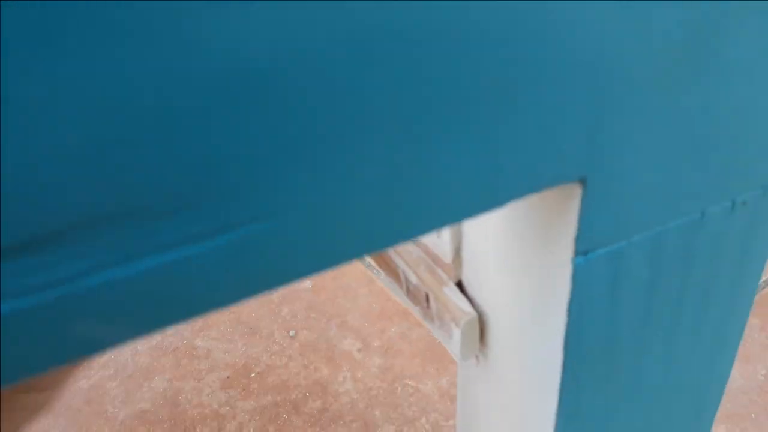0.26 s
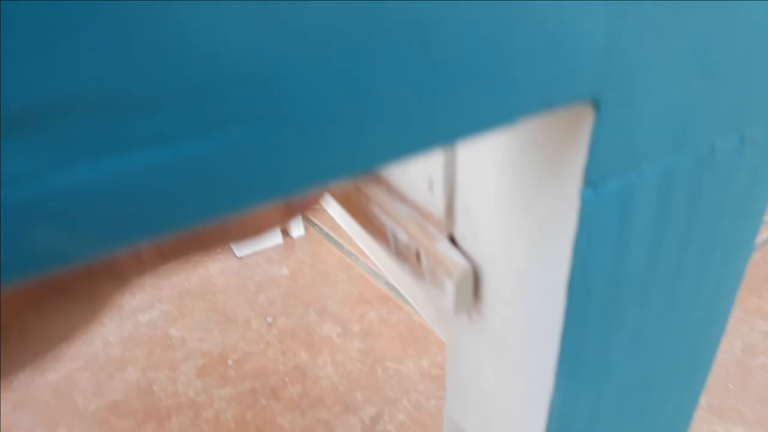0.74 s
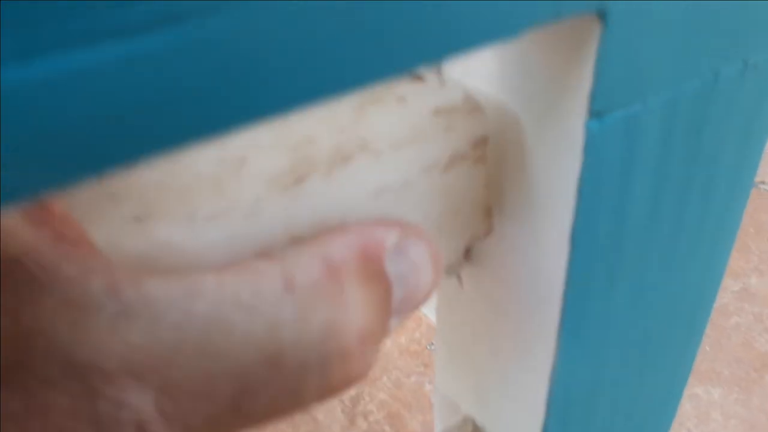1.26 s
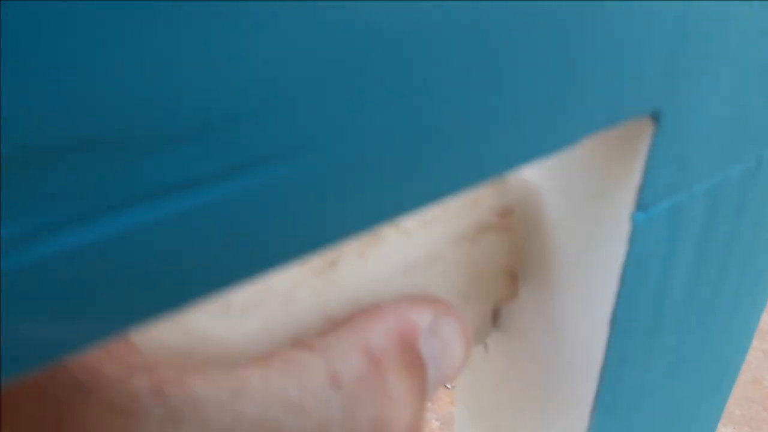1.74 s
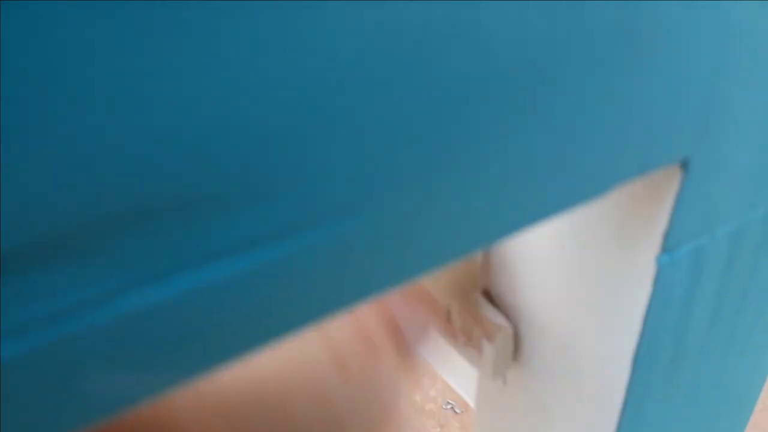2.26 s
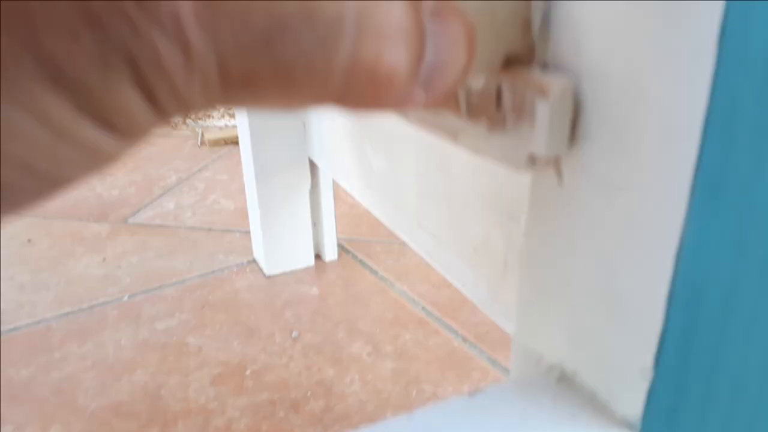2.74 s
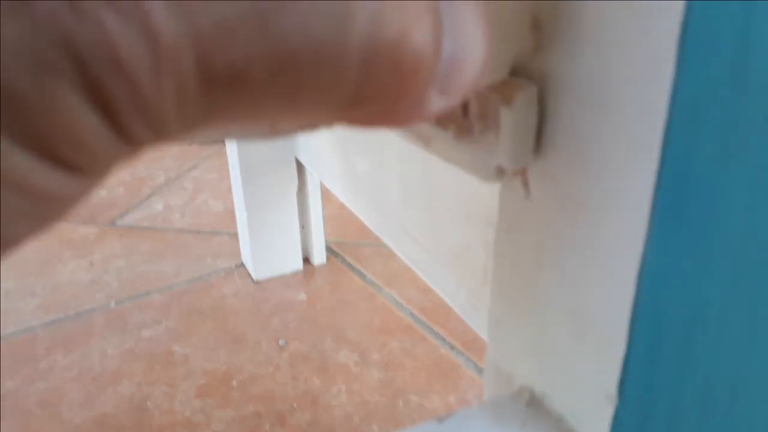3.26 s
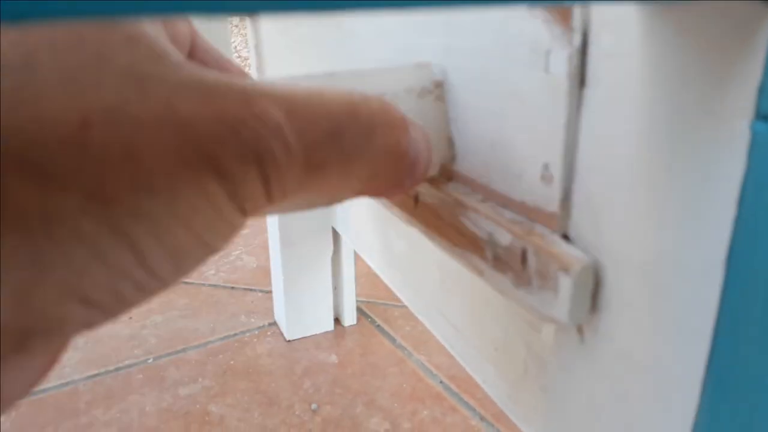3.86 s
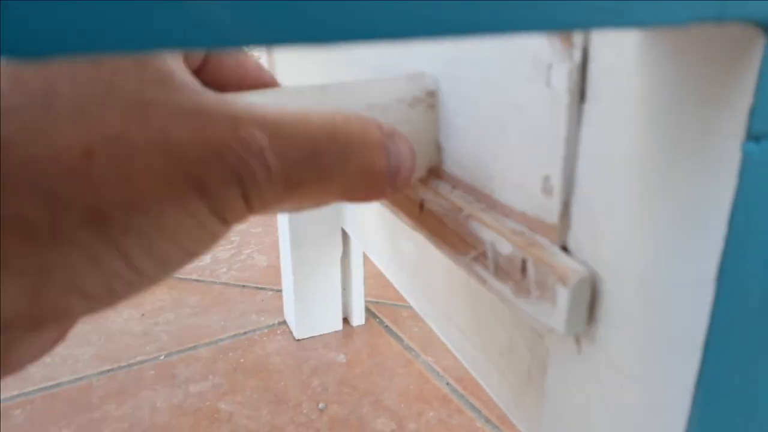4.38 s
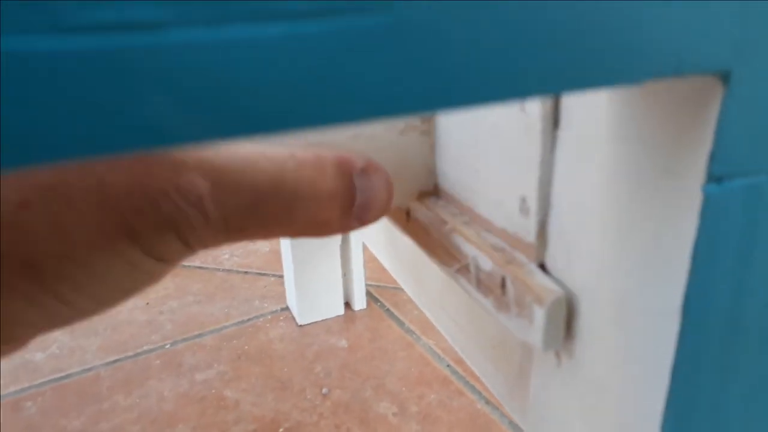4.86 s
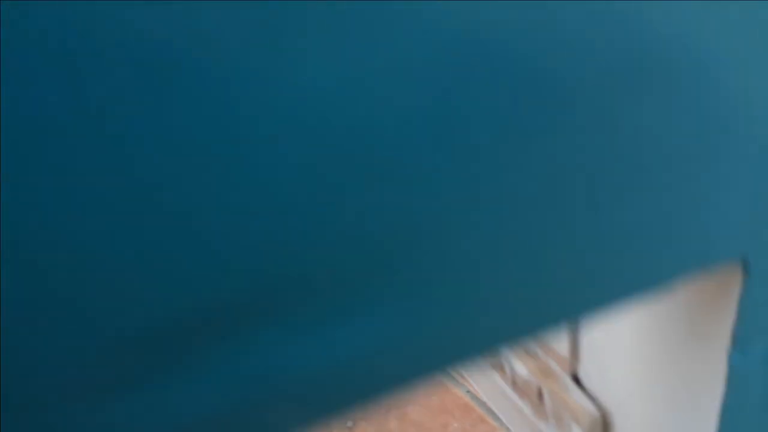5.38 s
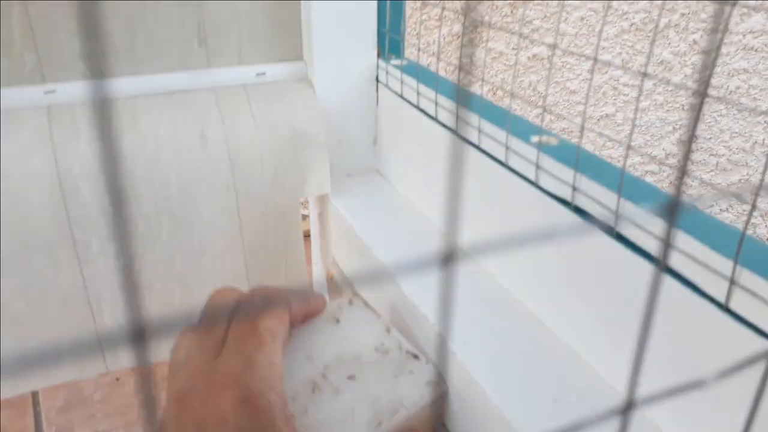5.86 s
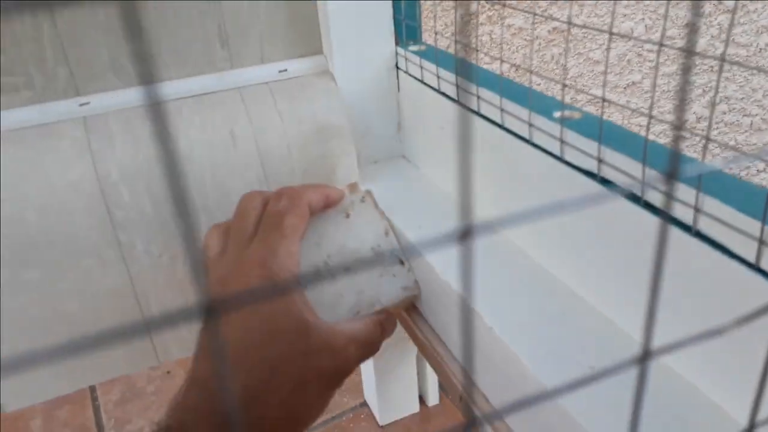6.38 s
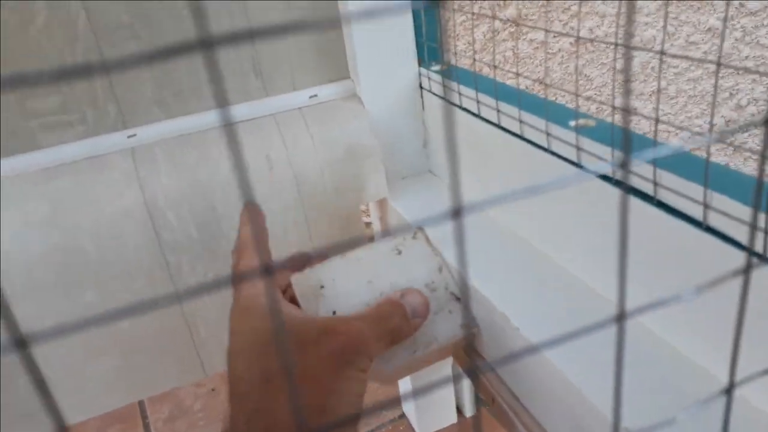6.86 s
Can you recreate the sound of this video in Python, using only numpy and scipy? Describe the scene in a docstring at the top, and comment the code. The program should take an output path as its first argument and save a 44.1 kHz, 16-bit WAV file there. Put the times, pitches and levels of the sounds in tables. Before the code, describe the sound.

Close up in a small room, wax scrapes and hisses along wood in uneven strokes, with light knocks and dry ticks near the end.

```python
"""A brief scrape and a sharp wooden knock open the scene: a block of wax strikes a drawer runner in a cabinet.
Impact excites the damped modes of frame and panel; rubbed back and forth, the wax hisses by sliding friction.
At each turn stick-slip gives a scrape that falls in pitch, and the side panel shudders.
Soft hisses are noise in drifting resonances; squeaks, ticks and whistles are resonances, bursts and tones.
A hand-held camera is close by in a small room: handling thumps, an echo, a short tail and quiet air."""
import sys
import numpy as np
from scipy import signal
from scipy.fft import rfft, irfft, next_fast_len
from scipy.io import wavfile

SR = 44100
rng = np.random.default_rng(int(sys.argv[2]) if len(sys.argv) > 2 else 0)


def to_wav(sig):
    """Store sig (one row per channel, or 1-D mono) as 16-bit WAV at the path in sys.argv[1].

    Samples outside -1..1 are clipped; the rate is SR.
    """
    pcm = np.clip(np.atleast_2d(sig), -1, 1) * 32767
    pcm = np.round(pcm).astype(np.int16)
    wavfile.write(sys.argv[1], SR, pcm.T)  # frames by channels


N = 314080  # length [samples]

# Impacts of block on wood: (time [s], blow level before the low cut [dB], centre of favoured modes [Hz],
# their spread [octaves], crack [dB], panel boom [dB], first touch relative to blow [dB], its scratch [dB])
KNOCKS = [(.0612, -12.5, 480, .58, -15.5, -29, -50, -70), (.0725, -20.5, 540, .35, -46, -40, -30, -60),
          (.3692, -25, 380, .45, -47, -44, -11, -40), (.6884, -19.5, 700, .8, -47, -46, -15, -39),
          (2.052, -42, 560, .9, -56, -52, -14, -62), (3.0885, -32.5, 620, .7, -58, -48, -15, -56),
          (3.115, -42, 520, .6, -66, -56, -20, -70), (3.351, -36, 580, .7, -62, -51, -14, -60),
          (3.746, -40, 560, .85, -60, -50, -12, -62), (3.843, -42, 520, .8, -62, -50, -14, -66),
          (4.401, -46, 500, .7, -64, -56, -12, -66), (4.718, -30.5, 560, .65, -62, -54, -12, -62),
          (4.8505, -20.5, 590, .9, -48, -42, -4, -44), (5.188, -38, 560, .7, -66, -54, -14, -70),
          (5.689, -39, 620, .7, -66, -56, -14, -70), (5.854, -33, 540, .65, -66, -50, -14, -70)]
# Spectral shape of a brittle crack: (frequency [Hz], gain [dB])
CRACK_SPECTRUM = [(300, -24), (1000, 13), (1800, 0.5), (2900, -0.5), (3300, 3.5), (4400, -9.5), (5900, 2.5),
                  (7400, -3.5), (8600, -27), (12000, -12.5), (15800, -59.5)]


def brittle_burst(top_hz, t60):
    """Band-limited impact: decaying noise whose treble is limited by the contact time."""
    t = np.arange(SR // 8) / SR
    burst = coloured(noise_pair(len(t)),
                     lambda f: read(CRACK_SPECTRUM, f) - 10 * np.log10(1 + (f / top_hz) ** 4))
    return burst * amp(-60 * t / t60)


def knocks(wood, panel, thud_db=0.5, thud_t60=0.09, push_db=-6.5, push_cycles=1.7, crack_t60=0.019,
           touch_s=0.0037, touch_t60=0.048, crack_top_hz=9000, dulling=0.068, contact_s=0.00029):
    """Impact excitation: a corner touches first, then a blow sets off push, thud, modes, crack and boom."""
    out, t = np.zeros((2, N)), np.arange(wood.shape[1]) / SR
    boom = coloured(panel, lambda f: hump(f, 160, 0.61)) * (1 - np.exp(-t / 0.029))
    for s, db, centre_hz, spread, crack_db, panel_db, touch_db, scratch_db in KNOCKS:
        push = np.sin(2 * np.pi * centre_hz * t) * np.exp(-centre_hz * t / push_cycles)
        thud = noise_pair(len(t)) * amp(-60 * t / thud_t60)
        frame = held(wood, shift=.012, spot_db=1.5, damping_db_per_s=0)
        thud = coloured(thud, lambda f: 1.76 * hump(f, centre_hz, spread))
        modes = coloured(frame, lambda f: 1.76 * hump(f, centre_hz, spread))
        # the wax gives a little, so the blow starts softly
        contact = 1 - np.exp(-(t / contact_s) ** 2)
        body = levelled(push, push_db, .02) + levelled(thud, thud_db, .02) + levelled(modes, 0, .02)
        body = levelled(body * contact, db, .02)
        # the narrow frame radiates little bass
        body = signal.sosfilt(signal.butter(2, 170, "high", fs=SR, output="sos"), body)
        # a softer blow stays longer in contact and sounds duller; dulling is in octaves per dB
        top_hz = crack_top_hz * 2 ** (dulling * (crack_db + 25.5))
        crack = brittle_burst(top_hz, crack_t60)
        scratch = brittle_burst(top_hz, touch_t60)
        add(out, s, body + levelled(boom, panel_db, .06))
        add(out, s, levelled(crack, crack_db, .006))
        add(out, s - touch_s, amp(touch_db) * body * amp(-60 * t / 0.065))
        add(out, s - touch_s, levelled(scratch, scratch_db, .006))
    return out


# Lightly damped runner modes after the first knock: (frequency [Hz], level [dB], decay t60 [s])
FREE_MODES = [(537, -34, 1), (500, -42.5, .6), (431, -41, .5), (716, -46.5, .6)]
RING_END_S = 0.33  # from the first knock to the end of the free ring


def free_ring(damping_s=0.063):
    """Free vibration: lightly damped modes sound on after the first knock, then are faded to silence."""
    out, t = np.zeros((2, N)), np.arange(SR // 2) / SR
    fade = np.clip((RING_END_S - t) / damping_s, 0, 1)
    add(out, KNOCKS[0][0], ring(FREE_MODES, lag=.00005) * fade)
    return out


# Strokes that grip and then slide: (time [s], length [s], scrape level [dB], scrape pitch [Hz],
# panel shudder [dB], hiss before the overall hiss gain [dB])
STROKES = [(0.0, 0.061, -36.5, 540, -47, -42), (0.9, 0.12, -47.5, 656, -47, -52.5),
           (1.205, 0.091, -43, 436, -48, -54), (1.322, 0.14, -49, 627, -50, -58),
           (1.492, 0.07, -47, 570, -51.5, -56.5), (1.6, 0.12, -51.5, 600, -51, -61.5),
           (1.752, 0.079, -46.5, 537, -43, -56.5), (1.855, 0.15, -49, 620, -50, -60),
           (2.037, 0.1, -54.5, 600, -45.5, -61), (2.148, 0.12, -54, 660, -56.5, -62),
           (2.287, 0.13, -55, 546, -48.5, -59.5), (2.407, 0.16, -73, 750, -71, -61),
           (3.195, 0.1, -51.5, 587, -46, -62.5), (3.492, 0.06, -39, 560, -48.5, -62),
           (3.59, 0.083, -44, 680, -51, -65.5), (3.728, 0.087, -42, 560, -44.5, -59.5),
           (3.826, 0.095, -45.5, 513, -45, -58), (3.942, 0.12, -40.5, 684, -42, -75),
           (4.094, 0.11, -50.5, 580, -52, -65), (4.224, 0.076, -44, 600, -48, -69),
           (4.384, 0.094, -51.5, 580, -57, -60), (4.661, 0.13, -56, 537, -51, -61),
           (4.76, 0.16, -53, 590, -47.5, -58), (4.972, 0.11, -36.5, 570, -48.5, -58),
           (5.143, 0.13, -43, 540, -44, -61.5), (5.302, 0.15, -44.5, 690, -45, -63.5),
           (5.495, 0.089, -39.5, 477, -41, -64), (5.666, 0.1, -45.5, 580, -49, -58.5),
           (5.82, 0.1, -40.5, 520, -40.5, -64.5), (5.963, 0.17, -43, 540, -45, -66),
           (6.162, 0.12, -42, 393, -48.5, -60.5), (6.325, 0.14, -53.5, 714, -51, -63.5),
           (6.658, 0.12, -46.5, 318, -48, -58), (6.754, 0.061, -53, 430, -66, -66)]
# Rasp on top of each scrape: (time [s], level relative to the scrape [dB])
RASP = [(0, -28), (1.3, -20), (1.8, -18), (2.4, -10.5), (3.5, -19), (4.0, -17), (5.35, -18.5), (5.5, -23),
        (6.7, -39)]
GRIP_SHARE, BUILD_SHARE = 0.64, 0.27  # gripping part of a stroke; part of the grip that builds pressure
LEAD_S = .03  # the wax starts to catch this long before the grip
SHOVE_DELAY_S = 0.0077  # from the start of the grip to the shove on the panel
FALL_OCTAVES = .12  # fall of the scrape's pitch during the grip


def scrapes(wood, panel, width_hz=560, rasp_hz=1480, dead_db=-1.0, scrape_db=0.0, shudder_db=0.0,
            shove_db=-4.0, shove_share=0.37, swell_share=0.15):
    """Stick-slip friction: slips swell through a falling resonance, and the grip shoves the panel."""
    out, t = np.zeros((2, N)), np.arange(wood.shape[1]) / SR
    for s, length, db, hz, panel_db, _ in STROKES:
        frame = held(wood, shift=.06, spot_db=3, damping_db_per_s=130)
        board = held(panel, shift=.04, spot_db=4, damping_db_per_s=30)
        grip = GRIP_SHARE * length
        heard_s = LEAD_S + grip
        u = (t - LEAD_S) / grip  # progress through the grip
        release = np.exp(-.5 * np.maximum(u - BUILD_SHARE, 0) - np.maximum(u - .85, 0) / 0.15)
        press = release / (1 + np.exp((BUILD_SHARE / 2 - u) / swell_share))
        slips = stick_slip(len(t)) * press
        pitch = hz * 2 ** (FALL_OCTAVES * (.55 - np.clip(u, 0, 1.3)))
        drive = coloured(resonate(slips, pitch, width_hz), lambda f: 2.5 * hump(f, hz, 1.1))
        rasp = coloured(slips, lambda f: 2.5 * hump(f, rasp_hz, 0.52))
        # the frame's modes answer, over the direct sound of the slips
        scrape = levelled(through(drive[0], frame)[:, :len(t)], 0, heard_s)
        scrape = scrape + levelled(drive, dead_db, heard_s)
        rasp_db = np.interp(s, *np.transpose(RASP))
        scrape = levelled(scrape, 0, heard_s) + levelled(rasp, rasp_db, heard_s)
        add(out, s - LEAD_S, scrape * amp(db + scrape_db) * np.sqrt(grip / heard_s))
        # the shove is a dull push, longer in a slow stroke, and it leaves the panel ringing
        shove = coloured(noise_pair(len(t)), lambda f: 1.3 * hump(f, 140.0, 0.66))
        shove = shove * t * np.exp(-t / grip / shove_share)
        ringing = levelled(through(shove[0], board)[:, :len(t)], -2.4, 0.11)
        ringing = ringing + levelled(board * (1 - np.exp(-t / 0.018)), 0, 0.033)
        shudder = ringing + levelled(shove, shove_db, 0.22)
        add(out, s + SHOVE_DELAY_S, levelled(shudder, panel_db + shudder_db, 0.13))
    return out


def stick_slip(size, per_s=125, uneven_octaves=.6, uneven_db=3.5, slip_s=0.0032, creep_db=-10):
    """Relaxation oscillation: an uneven train of decaying noise bursts, one a slip, over a steady creep."""
    turns = np.cumsum(per_s * 2 ** (uneven_octaves * wander(size, per_s))) / SR
    strength = amp(uneven_db * np.clip(rng.standard_normal(size), -2, 2))
    jolts = np.diff(np.floor(turns), prepend=0) * strength
    bursts = signal.lfilter([1], [1, -np.exp(-1 / (slip_s * SR))], jolts)
    return noise_pair(size) * (amp(creep_db) + bursts)


# Spectral shape of the sliding hiss: (frequency [Hz], gain [dB])
HISS_SPECTRUM = [(300, -2), (1000, 4), (1400, -1.5), (1750, -7.5), (1980, -2), (2220, -2.5), (2800, -5),
                 (4500, -1), (5400, -3.5), (6100, -2.5), (7400, -3), (8600, -19), (11000, -13),
                 (15800, -17.5)]


def sliding(wood, panel, grain_db=1.5, patch_db=3.0, hiss_db=4.5, fizz_db=0.0, grind_db=-1.0, drone_db=-3.5):
    """Sliding friction over grain: gritty noise as hiss, with judder that keeps frame and panel murmuring."""
    speed, fine = drag()
    grit = noise_pair(N) * amp(grain_db * wander(N, 1500) + 1.0 * wander(N, 90))
    spectrum = rfft(coloured(grit, lambda f: read(HISS_SPECTRUM, f)))
    # the contact patch changes, so neighbouring bands swell on their own
    edges, hiss = np.geomspace(900, 8200, num=12), np.zeros((2, N))
    band = np.searchsorted(edges, np.fft.rfftfreq(N, 1 / SR))
    for k in range(len(edges)):
        hiss += irfft(spectrum * (band == k), N) * amp(patch_db * wander(N, 22))
    fizz = irfft(spectrum * (band == len(edges)), N)  # all above the top edge
    judder = rng.standard_normal(N) * amp(2.6 * wander(N, 46)) * speed
    grind = through(judder, wood / np.linalg.norm(wood[0]))[:, :N]
    drone = through(judder, panel / np.linalg.norm(panel[0]))[:, :N]
    out = amp(hiss_db) * speed * evened(mirrored(hiss)) + amp(fizz_db) * fine * evened(fizz)
    return out + amp(grind_db) * grind + amp(drone_db) * drone


# Light passes without gripping: (time [s], length [s], hiss before the overall hiss gain [dB])
GLIDES = [(0.075, 0.25, -50.5), (0.265, 0.19, -64), (0.455, 0.2, -50), (1.061, 0.19, -54.5),
          (2.586, 0.1, -67), (2.89, 0.2, -73.5), (3.073, 0.14, -60.5), (3.354, 0.18, -61.5),
          (3.985, 0.17, -56), (4.272, 0.17, -57), (4.482, 0.16, -62.5), (5.028, 0.12, -61.5),
          (5.55, 0.15, -59), (5.887, 0.089, -61.5), (6.031, 0.12, -56), (6.4, 0.31, -61.5),
          (6.807, 0.25, -55), (7.054, 0.16, -58.5)]
# Fizz above about 8 kHz: (time [s], level relative to the pass [dB])
FIZZ = [(0, -5.5), (.2, 2), (.55, 1), (1.15, -8), (1.4, -4), (2.45, -1), (3.7, -8.5), (3.9, -0.5),
        (5.2, -4), (5.6, -2.5), (6.2, -1), (6.7, -13), (7.1, -6.5)]
FIZZ_POWER = 1.5  # exponent of speed for the fizz


def drag(resting_db=-76):
    """Incoherent addition: the powers of all passes sum, over the faint rub of the resting block."""
    t = np.arange(0, N, 64) / SR
    hiss, fizz = amp(resting_db) ** 2, 0
    for s, length, *_, db in STROKES + GLIDES:
        speed = passing(t, s, length)
        hiss = hiss + (amp(db) * speed) ** 2
        fizz = fizz + (amp(db) * speed ** FIZZ_POWER) ** 2
    fizz = fizz * amp(np.interp(t, *np.transpose(FIZZ))) ** 2
    return [np.interp(np.arange(N) / SR, t, np.sqrt(power)) for power in (hiss, fizz)]


FASTEST_SHARE = 0.3  # part of a pass after which the hand is fastest
TURN_DB = 8.5  # how much quieter the hiss is half a pass away from that moment
TURN_STEEPNESS = 2.28  # higher keeps the speed even for longer and turns more abruptly


def passing(t, s, length):
    """Speed dependence of friction noise: the hand gathers pace and slows for the turn, 0 to 1."""
    away = np.minimum(2 * abs((t - s) / length - FASTEST_SHARE), 4)
    return amp(-TURN_DB * away ** TURN_STEEPNESS)


def mirrored(x, delay_s=0.001391, sway_octaves=.3, share=0.48):
    """Comb filtering: the side panel reflects the hiss over a changing path, so bands of colour drift."""
    at = np.arange(N)
    heard = []
    for side in x:
        delay = SR * delay_s * 2 ** (sway_octaves * wander(N, 7))
        heard.append(np.interp(at - delay, at, side))
    return x + share * np.array(heard)


# Soft hisses in narrow bands: (time [s], length [s], level before panning [dB],
# centre of favoured bands [Hz], their spread [octaves], left minus right [dB])
SOFT_HISSES = [(0.439, 0.2, -52, 1700, 0.32, -3), (.97, 0.36, -54.5, 2070, 0.5, -2),
               (1.11, .11, -51, 1980, 0.34, -1), (1.361, 0.14, -63.5, 1780, 0.31, -2),
               (2.074, .26, -71, 2230, .07, -3), (2.299, .37, -70.5, 2230, .07, -3),
               (3.37, .13, -63, 2900, 0.35, -3), (4.847, 0.019, -35.5, 1440, 0.094, -2),
               (6.891, 0.097, -51, 1600, 0.21, 1), (6.95, 0.29, -56, 1540, .15, 2),
               (6.983, 0.24, -60, 2900, 0.33, 3)]
# Resonances that colour the soft hisses: (frequency [Hz], width of each resonator pass [Hz], level [dB])
SOFT_BANDS = [(1463, 200, -1), (1740, 350, 4), (2190, 190, 0.5), (3050, 547, -1.5), (4130, 600, 6.5)]
SOFT_PEAK_SHARE = 0.47  # part of a soft hiss after which it is loudest


def soft_hisses(drift_octaves=0.025, grain_db=1.0):
    """Resonant filtering of noise: soft hisses in narrow, drifting bands that swell and fade."""
    out = np.zeros((2, N))
    for s, length, db, centre_hz, spread, pan_db in SOFT_HISSES:
        size = SR // 2
        u = np.arange(size) / SR / length
        rise_fall = np.interp(u, [0, np.clip(SOFT_PEAK_SHARE, .1, .9), 1], [0, 1, 0])
        swell = np.sin(np.pi / 2 * rise_fall) ** 0.68
        noise, tone = noise_pair(size) * amp(grain_db * wander(size, 250)), 0
        for hz, width_hz, band_db in SOFT_BANDS:
            pitch = hz * 2 ** (drift_octaves * wander(size, 13))
            band = evened(resonate(resonate(noise, pitch, width_hz), pitch, width_hz))
            tone = tone + amp(band_db + hump(hz, centre_hz, spread)) * band
        add(out, s, levelled(tone * swell, db, length) * amp(np.array([[.5], [-.5]]) * pan_db))
    return out


# Thin squeaks as the block turns: (time [s], length [s], level [dB], pitch at mid-length [Hz])
SQUEAKS = [(0.915, 0.042, -56, 4420), (2.603, 0.064, -62, 4900), (3.924, 0.092, -58, 4870),
           (4.356, 0.071, -61, 4100)]


def squeaks(width_hz=300, fall_octaves_per_s=1.3):
    """Fast stick-slip of a corner: noise in a sinking resonance is a fuzzy whistle that swells and fades."""
    out, t = np.zeros((2, N)), np.arange(SR // 8) / SR
    for s, length, db, hz in SQUEAKS:
        pitch = hz * 2 ** (-fall_octaves_per_s * (t - length / 2))
        whistle = resonate(resonate(noise_pair(len(t)), pitch, width_hz), pitch, width_hz)
        add(out, s, levelled(whistle * np.sin(np.pi * np.minimum(t / length, 1)), db, length))
    return out


# Small dry ticks: (time [s], level [dB], centre [Hz], spread [octaves], thud level [dB])
TICKS = [(.843, -53.5, 4660, .6, -46), (3.227, -52, 2200, 1.2, -65), (4.336, -42.5, 2440, 0.93, -46),
         (4.357, -53, 2000, 0.99, -56), (4.43, -49, 1910, 0.85, -63), (5.2029, -44.5, 2380, 0.83, -40),
         (6.7283, -59, 7960, 0.61, -79), (6.88, -36.5, 1480, 0.42, -43), (6.89, -35, 1570, 0.65, -39),
         (6.8968, -30.5, 1480, 0.27, -46.5), (6.946, -40.5, 1620, 0.49, -60)]


def ticks(t60=0.014, snap_db=-11, ring_db=-15, ring_t60=0.12, ring_spread=0.12, thud_hz=420, thud_t60=0.048):
    """Transient excitation: one noise burst feeds a coloured snap, a small thud and a brief ring."""
    out, t = np.zeros((2, N)), np.arange(4096) / SR
    for s, db, centre_hz, spread, thud_db in TICKS:
        burst = noise_pair(len(t))
        tick = evened(coloured(burst, lambda f: 1.1 * hump(f, centre_hz, spread)))
        snap = evened(coloured(burst, lambda f: read(CRACK_SPECTRUM, f)))
        tone = evened(coloured(burst, lambda f: 5.3 * hump(f, centre_hz, ring_spread)))
        tone = tone * amp(ring_db - 60 * t / ring_t60)
        thud = coloured(burst, lambda f: 3.8 * hump(f, thud_hz, 0.68)) * amp(-60 * t / thud_t60)
        dry_tick = (tick + amp(snap_db) * snap) * amp(-60 * t / t60) + tone
        add(out, s, levelled(dry_tick, db, .003) + levelled(thud, thud_db, .006))
    return out


# Faint gliding whistles, one list for each: (time [s], pitch [Hz], level [dB]), before random flutter
WHISTLES = [
    [(2.83, 6000, -80), (2.885, 6800, -69), (2.925, 6100, -76), (2.96, 6550, -70), (3.01, 5850, -67),
     (3.04, 5650, -82)],
    [(6.4, 7400, -76), (6.45, 7950, -71), (6.49, 7600, -68), (6.53, 6900, -74), (6.58, 7500, -69),
     (6.65, 6850, -73)],
    [(6.72, 6400, -69), (6.77, 6950, -61), (6.81, 8000, -63), (6.85, 8150, -62), (6.875, 8600, -66),
     (6.93, 7400, -62), (6.97, 6300, -64)],
    [(7.02, 5900, -69), (7.07, 6200, -58), (7.125, 6150, -56)],
]


def whistles(width_hz=70):
    """Frequency modulation: thin sine tones, made fuzzy by random pitch, glide without a break."""
    out = np.zeros((2, N))
    for points in WHISTLES:
        s, hz, db = np.transpose(points)
        t = np.arange(s[0], s[-1], 1 / SR)
        pitch = np.interp(t, s, hz) + width_hz * wander(len(t), 500)
        fade = np.clip(np.minimum(t - s[0], s[-1] - t) / .008, 0, 1)
        level = amp(np.interp(t, s, db) + 3.2 * wander(len(t), 120))
        add(out, s[0], evened(np.sin(2 * np.pi * np.cumsum(pitch) / SR)) * level * fade)
    return out


# The hand shifts on the camera: (time [s], length [s], level before panning [dB])
BUMPS = [(0.097, 0.097, -44), (0.233, 0.11, -44), (0.556, 0.087, -49.5), (5.567, 0.11, -42.5),
         (5.61, 0.056, -33), (5.637, 0.086, -42), (5.929, 0.073, -51)]


def handling(top_hz=260, low_hz=50, fall_s=0.029, width_hz=100):
    """Structure-borne sound: soft thumps through the camera body, mostly at the left, sinking in pitch."""
    out, t = np.zeros((2, N)), np.arange(SR // 3) / SR
    for s, length, db in BUMPS:
        pitch = low_hz + top_hz * np.exp(-t / fall_s)
        thump = resonate(resonate(noise_pair(len(t)), pitch, width_hz), pitch, width_hz)
        thump = thump * np.sin(np.pi * np.minimum(t / length, 1)) ** 2
        add(out, s, levelled(thump, db, length) * amp([[4], [-12]]))
    return out


# Reverberation time of the room: (frequency [Hz], decay t60 [s])
ROOM_T60 = [(100, 1), (250, 0.62), (600, 0.48), (1400, 0.51), (4000, 0.3), (12000, 0.59)]


def room(x, wet_db=-11, echo_db=-7, echo_s=0.0045):
    """Reflection and reverberation: one quick echo off the cabinet wall, and a tail that dies by band."""
    tail = noise_pair(SR) * np.clip(np.arange(SR) / SR / 0.0041 - .5, 0, 1)
    hz, t, z = signal.stft(tail, SR, nperseg=256)
    tail = signal.istft(z * amp(-60 * t / read(ROOM_T60, hz)[:, None]), SR, nperseg=256)[1]
    out = x + amp(wet_db) * through(x, tail / np.linalg.norm(tail[0]))[:, :N]
    # the echo arrives with its sides swapped
    add(out, echo_s, amp(echo_db) * coloured(x[::-1], lambda f: hump(f, 5800, 0.93)))
    return out


# Spectral shape of the quiet air: (frequency [Hz], gain [dB])
AIR_SPECTRUM = [(20, -23), (60, -25), (105, 5.5), (220, -9.5), (330, -15), (1100, -49.5), (3000, -27),
                (4300, -22.5), (6600, -32.5), (8500, -41.5), (15800, -38.5)]


def quiet_air(level_db=-57.5):
    """Stationary background noise: random pressure shaped by a fixed spectrum."""
    return amp(level_db) * evened(coloured(noise_pair(N), lambda f: read(AIR_SPECTRUM, f)))


def ring(modes, lag):
    """Modal decay: damped modes after one tap, with a different phase at each microphone."""
    t = np.arange(SR // 2) / SR
    out = np.zeros((2, len(t)))
    for k, (hz, db, t60) in enumerate(modes):
        late = np.array([[0], [lag * (1 + np.cos(k * np.pi * (3 - np.sqrt(5))))]])
        out += (-1) ** k * amp(db - 60 * t / t60) * np.sin(2 * np.pi * hz * (t - late))
    return out


def held(response, shift, spot_db, damping_db_per_s):
    """Contact loading: the block's pressure detunes and damps a body, and each spot favours other modes."""
    at = np.arange(response.shape[1])
    stretch = 2 ** (shift * rng.standard_normal())
    pressed = np.array([np.interp(at * stretch, at, side) for side in response])
    spot = np.transpose([np.geomspace(80, 2400, num=24), spot_db * rng.standard_normal(24)])
    return coloured(pressed, lambda f: read(spot, f)) * amp(-damping_db_per_s * at / SR)


def resonate(x, hz, width_hz):
    """Heterodyne resonance: shifts the curve hz to zero, smooths, and shifts back."""
    turn, r = np.exp(2j * np.pi * np.cumsum(hz) / SR), np.exp(-np.pi * width_hz / SR)
    return 2 * (turn * signal.lfilter([1 - r], [1, -r], x / turn)).real


# Likeness of the two microphones: (frequency [Hz], left-right correlation [0 to 1])
ALIKE = [(60, 1), (150, 1), (300, 0.78), (640, 0.35), (1400, 0.17), (3000, 0.029), (7000, 0.07),
         (15000, 0.46)]


def noise_pair(size):
    """Diffuse-field coherence: white noise at two microphones, shared by frequency as tabulated."""
    a, b = rfft(rng.standard_normal((2, size)))
    same = np.clip(read(ALIKE, np.fft.rfftfreq(size, 1 / SR)), -1, 1)
    return irfft(np.array([a, same * a + np.sqrt(1 - same ** 2) * b]), size)


def wander(size, per_s):
    """Slow random modulation: straight lines between unit-variance random knots."""
    knots = rng.standard_normal(size)
    return np.interp(np.arange(size) * per_s / SR, np.arange(size), knots)


def coloured(x, db_at):
    """Spectral filtering by a gain in dB, given as a function of frequency."""
    size = next_fast_len(x.shape[-1] + 1024)
    return irfft(rfft(x, size) * amp(db_at(np.fft.rfftfreq(size, 1 / SR))), size)[..., :x.shape[-1]]


def hump(hz, centre_hz, octaves):
    """Band-pass response: a broad peak in dB with curved skirts on log frequency."""
    return -10 * np.log10(1 + (np.log2((hz + 1) / centre_hz) / octaves) ** 4)


def through(x, response):
    """Linear convolution of a drive with a two-channel response."""
    return signal.fftconvolve(np.atleast_2d(x), response, axes=1)


def causal(db_at, size=4096):
    """Minimum phase: an impulse response with the gain db_at(Hz) that does not ring ahead of a hit."""
    log_gain = np.log(amp(db_at(abs(np.fft.fftfreq(size, 1 / SR)))))
    return np.fft.ifft(np.exp(signal.hilbert(log_gain).conj())).real[..., :size // 2]


def amp(db):
    """Logarithmic level: decibels to gain."""
    return 10 ** (np.asarray(db) / 20)


def evened(x):
    """Root-mean-square normalisation to 1."""
    return x / np.sqrt(np.mean(x ** 2) + 1e-20)


def levelled(x, db, seconds):
    """Root-mean-square level: scales a sound so that its first seconds have the level db."""
    return amp(db) * x / np.sqrt(np.mean(x[..., :int(seconds * SR)] ** 2) + 1e-20)


def read(points, hz):
    """Interpolation of a table along log frequency."""
    f, value = np.transpose(points)
    return np.interp(np.log(hz + 1), np.log(f + 1), value)


def add(mix, s, sound):
    """Linear superposition: mixes a sound in at time s."""
    part = mix[:, max(round(s * SR), 0):][:, :sound.shape[-1]]
    part += sound[..., :part.shape[-1]]


# Modes of the runner and cabinet frame: (frequency [Hz], level [dB], unpressed decay t60 [s])
WOOD_MODES = [(257, -15.5, 0.037), (329.2, 2, 0.11), (399, 3, 0.059), (448.8, 5, 0.062), (510, -2.5, 0.093),
              (551.5, -9.5, 0.24), (595.3, -5, 0.14), (720, -9.5, 0.096), (761, -10, 0.17),
              (890, -15, 0.078), (914, -9.5, 0.17), (1115, -19.5, 0.41), (1120, -11, 0.068),
              (1301, -2.5, 0.076), (1487, -14.5, 0.12), (1477, -22, 0.23), (1595, -9.5, .13),
              (1786, -19, 0.15)]
# Modes of the thin side panel: (frequency [Hz], level [dB], unpressed decay t60 [s])
PANEL_MODES = [(84, -14, .15), (103, -8, .4), (128, -10, .14), (152, 0, .32), (172, -8, .14), (210, -9, .2),
               (245, -10, .15)]


def scene():
    """Superposition: wax on wood, soft hisses and whistles in the room, with handling and quiet air added."""
    wood, panel = ring(WOOD_MODES, lag=0.000084), ring(PANEL_MODES, lag=0.00035)
    wax = knocks(wood, panel) + free_ring() + scrapes(wood, panel) + sliding(wood, panel)
    near = wax + soft_hisses() + squeaks() + ticks() + whistles()
    return room(near) + handling() + quiet_air()


# Colour of the two microphones: (frequency [Hz], left minus right [dB])
BALANCE = [(60, 5), (200, -0.5), (380, 3), (700, 1.5), (1300, -1), (2400, -3.5), (4400, -5.5), (7000, -1),
           (8600, 5.5), (15000, 4.5)]
EDGE_HZ = 15850  # upper band limit


def record(dry, low_cut_hz=54):
    """Transduction: microphones differ in colour and delay; then low cut, ceiling on peaks, band limit."""
    colour = causal(lambda f: np.array([[.5], [-.5]]) * read(BALANCE, f))
    left, right = through(dry, colour)[:, :N]
    heard = np.array([left, np.pad(right, (4, 0))[:N]])  # right is 4 samples late
    heard = signal.sosfilt(signal.butter(2, low_cut_hz, "high", fs=SR, output="sos"), heard)
    heard = np.clip(heard, -.82, .82)
    band_limit = signal.firwin(511, EDGE_HZ, window=("kaiser", 9), fs=SR)
    return signal.oaconvolve(heard, band_limit[None], "same")


dry = scene()
out = record(dry)
to_wav(out)
```